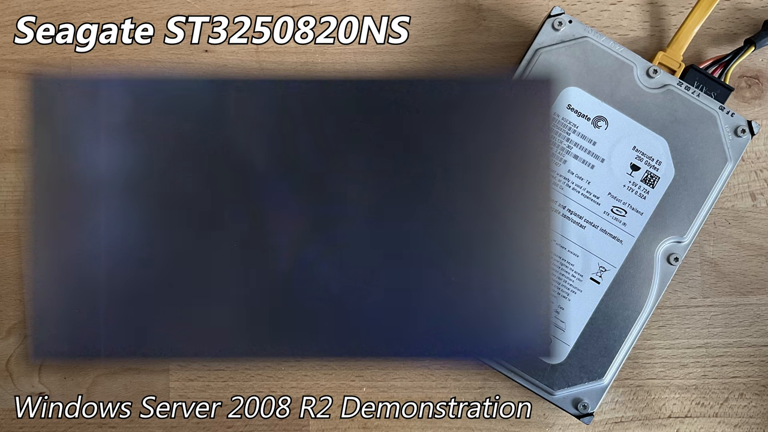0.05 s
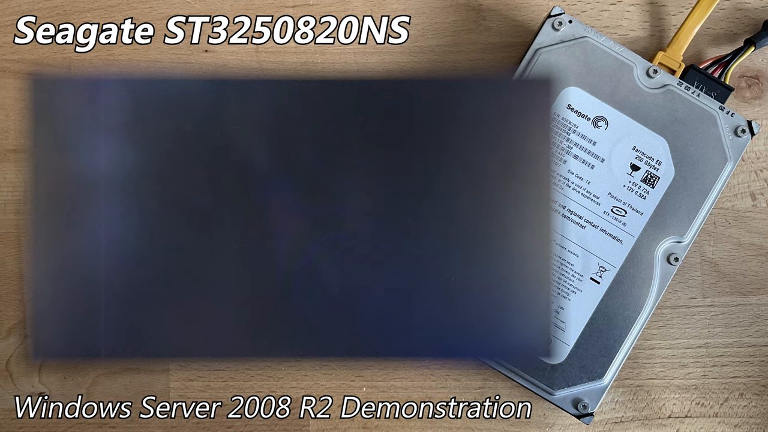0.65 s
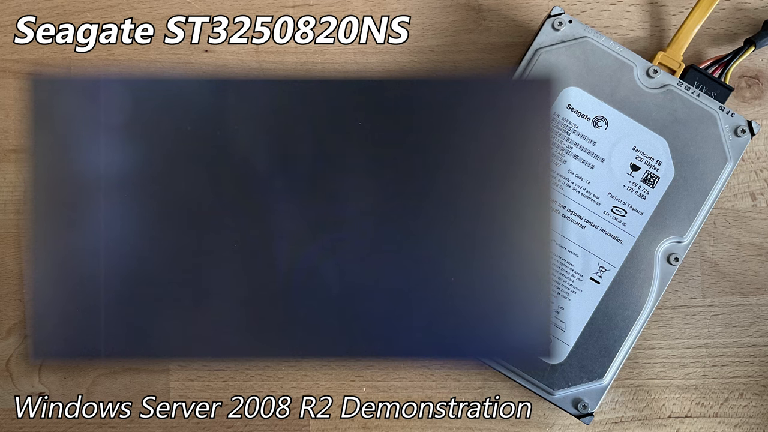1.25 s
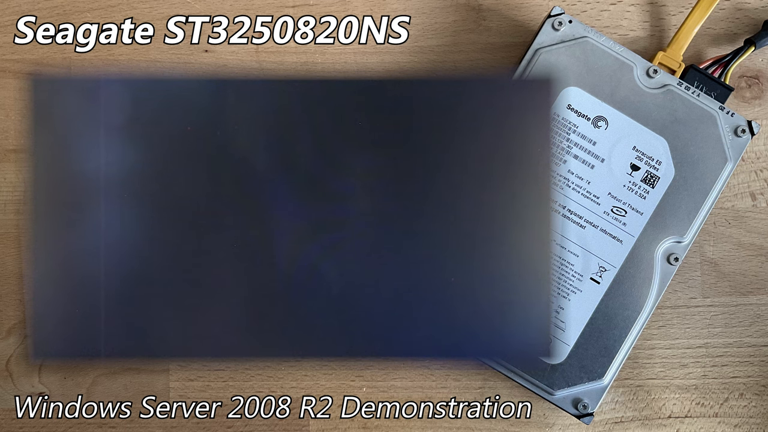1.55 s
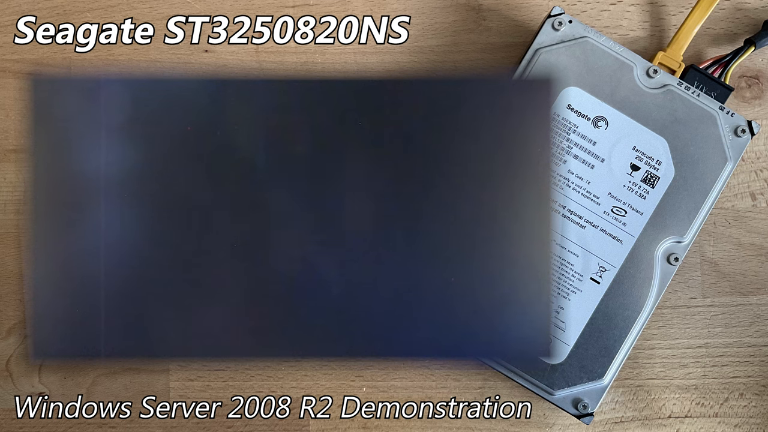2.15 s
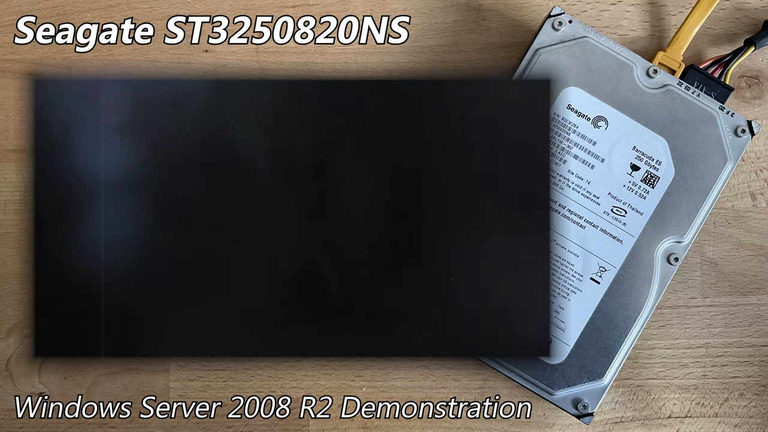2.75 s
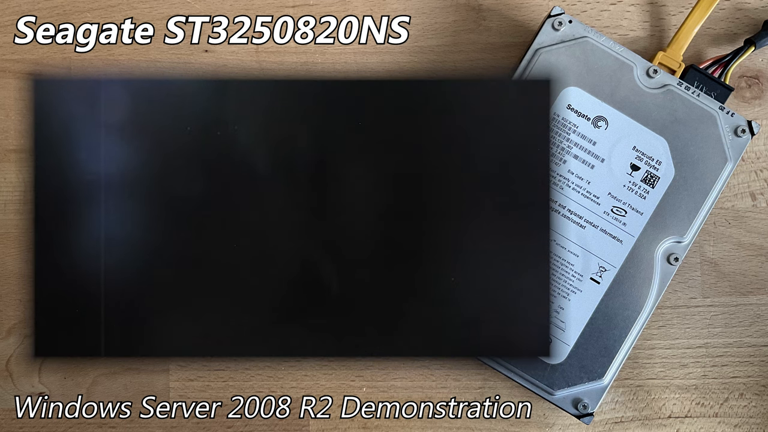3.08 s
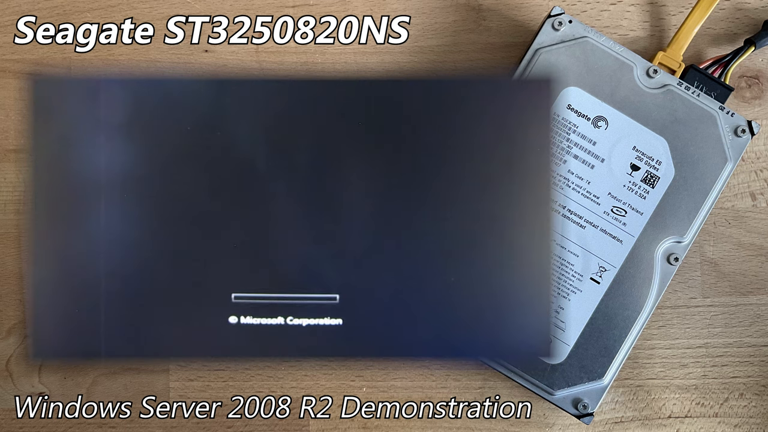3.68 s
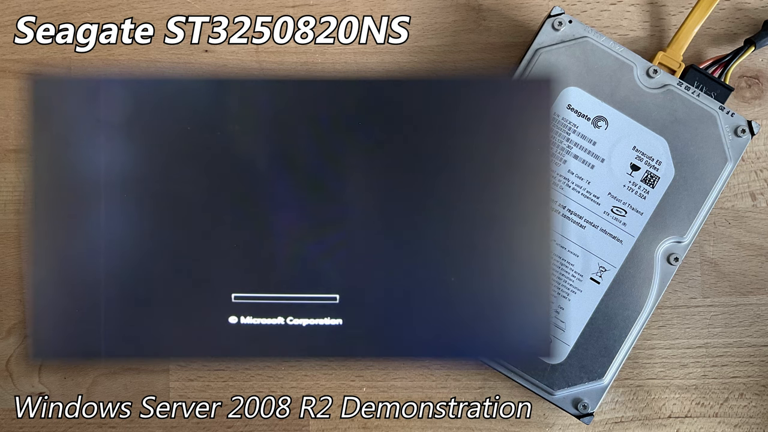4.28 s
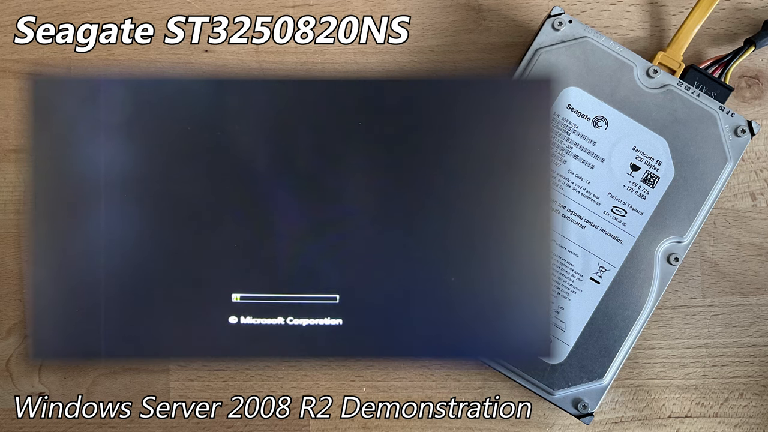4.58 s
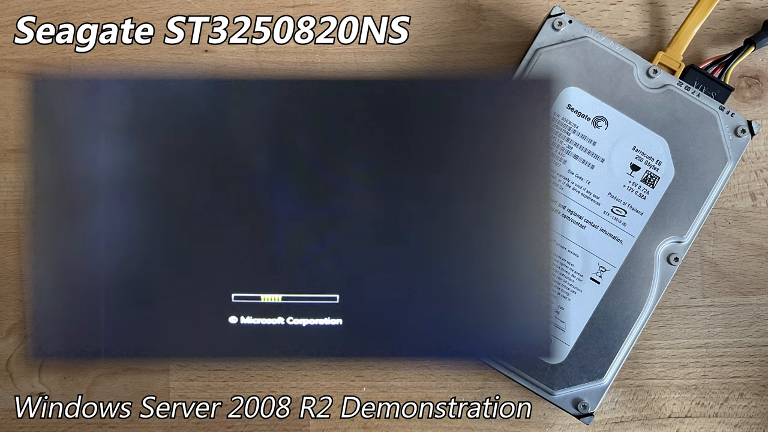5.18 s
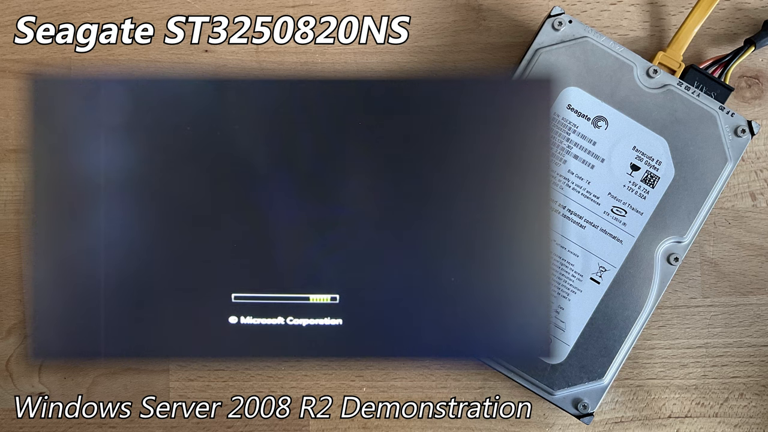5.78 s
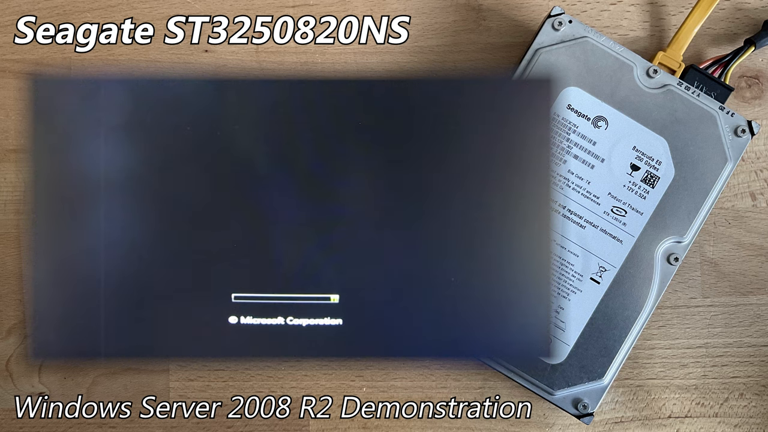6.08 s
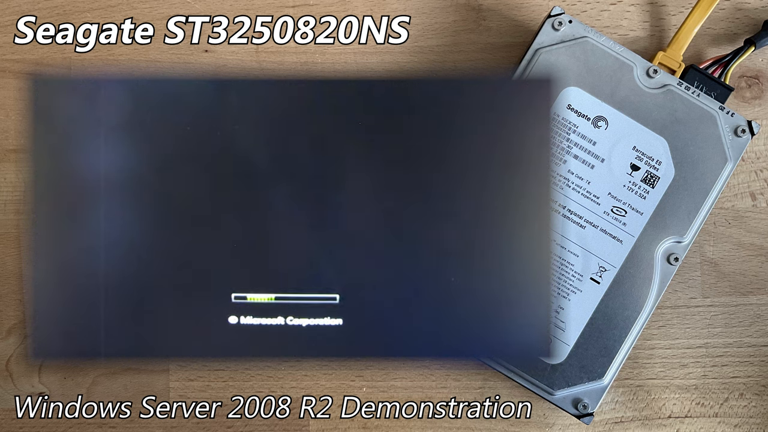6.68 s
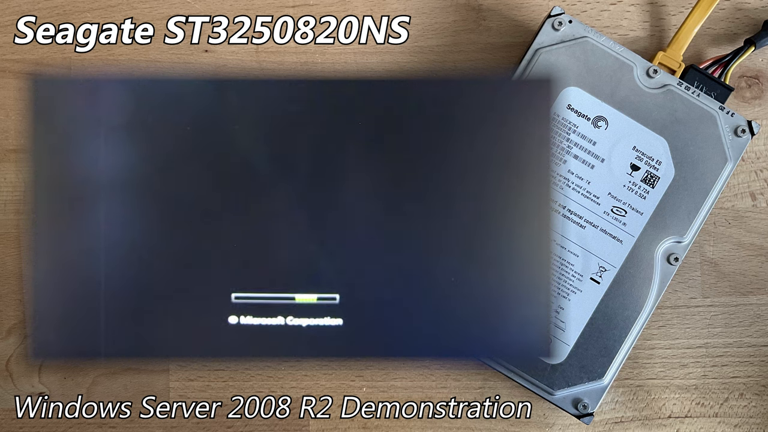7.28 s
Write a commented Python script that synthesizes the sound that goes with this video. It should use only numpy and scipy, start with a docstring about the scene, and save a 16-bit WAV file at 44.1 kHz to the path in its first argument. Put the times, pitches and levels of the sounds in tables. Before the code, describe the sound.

Close hard drive whirr with scattered seek clicks, a quieter stretch, then low desk thumps and more ticking.

```python
"""Hard drive on a desk

A bare 7200 rpm hard drive works on a wooden desk, heard close up over room rumble and mains hum.
The spindle hums and whines, and air dragged by the platters rushes in the casing.
The head arm ticks, chirps and clacks as it seeks; its longest strokes thump the desk."""
import sys
import numpy as np
from scipy import signal
from scipy.fft import rfft, irfft, next_fast_len
from scipy.io import wavfile
from scipy.ndimage import map_coordinates

SR = 44100
rng = np.random.default_rng(int(sys.argv[2]) if len(sys.argv) > 2 else 0)


def put_to_file(sound):
    """Save the sound as 16-bit audio at rate SR, in the file named by the first command-line argument."""
    columns = np.atleast_2d(sound).T  # one column per channel
    safe = np.clip(columns, -1, 1)
    whole_steps = np.round(safe * 32767)
    wavfile.write(sys.argv[1], SR, whole_steps.astype(np.int16))


N = 332514
t = np.arange(N) / SR

# A hollow in the sound at the listening spot. Each row: centre in Hz, width in Hz, gain in dB.
HOLLOW = [(688, 131, -19)]
# Tone of the shaken desk. Each row: frequency in Hz, gain in dB.
DESK_SHUDDER = [(30, -24), (75, 6), (150, -6), (205, 5), (240, -6.5), (270, -3), (370, -11.5), (440, -20.5),
                (800, -48), (4000, -85)]
# Spells of reading. Each row: start and end in seconds, chatter level in dB, faint seeks a second.
READ_SPELLS = [(0, 1.83, -44, 11), (5.25, 7.54, -43, 7)]
# Long seeks that kick the arm hard. Each row: start in seconds, relative level in dB.
LONG_SEEKS = [(5.1546, -14.5), (7.2205, -14.5), (7.2946, -14.5)]
# Full strokes across the platters. Each row: start in seconds, thump and hiss gains in dB.
FULL_STROKES = [(4.3482, 0, -31), (4.4237, 1, -31), (4.4397, 0, -29.5), (4.4901, .5, -31), (5.486, .5, -31),
                (5.5162, .8, -32)]


def amp(db):
    """Decibels to gain."""
    return 10 ** (np.asarray(db) / 20)


def unit(x):
    """Scale to rms 1."""
    return x / np.sqrt(np.mean(x ** 2) + 1e-20)


def response(points, bells=(), size=16384):
    """Impulse response of unit energy from (Hz, dB) points and (Hz, width in Hz, dB) bells."""
    hz = np.fft.rfftfreq(size, 1 / SR)
    point_hz, point_db = np.transpose(points)
    db = np.interp(np.log(hz + 1), np.log(np.sort(point_hz)), point_db)
    for centre, width, lift in bells:
        db = db + lift * .5 ** ((2 * (hz - centre) / width) ** 2)
    # minimum phase, so nothing rings before the hit
    cepstrum = irfft(np.log(unit(amp(db))), size)
    cepstrum[1:size // 2] *= 2
    cepstrum[size // 2 + 1:] = 0
    return irfft(np.exp(rfft(cepstrum)), size)


def coloured(x, points, bells=()):
    """Play x through a body with this tone curve and these peaks or dips."""
    return signal.fftconvolve(x, response(points, bells))[:N]


def filtered(x, gain_at):
    """Filter x by a complex gain, given as a function of Hz."""
    size = next_fast_len(N + SR)
    return irfft(rfft(x, size) * gain_at(np.fft.rfftfreq(size, 1 / SR)), size)[:N]


def wobble(rate):
    """A smooth random curve, rate knots a second."""
    return map_coordinates(rng.standard_normal(int(N * rate / SR) + 4), [t * rate / SR])


def add(track, start, sound):
    """Mix a sound into a track at start seconds."""
    part = track[max(0, round(start * SR)):][:len(sound)]
    part += sound[:len(part)]


def tone(cycles):
    """A sine of rms 1 with a random starting phase."""
    return np.sqrt(2) * np.sin(2 * np.pi * (cycles + rng.random()))


def burst(rise_s):
    """A puff of noise that swells for rise_s and dies away."""
    age = t[:SR // 20] / rise_s
    return age * np.exp(1 - age) * rng.standard_normal(len(age))


def tap(body, rise_s):
    """A short rough push on a body, with peak 1."""
    sound = signal.fftconvolve(burst(rise_s), body)
    return sound / np.abs(sound).max()


def room_rumble(level_db=-33):
    """The room's deep rumble lies under everything."""
    # Each row: frequency in Hz, gain in dB.
    rumble_eq = [(5, 1.5), (15, -5), (25, -19.5), (36, -21.5), (60, -27), (150, -67), (1000, -120)]
    return amp(level_db) * unit(coloured(rng.standard_normal(N), rumble_eq))


def mains_hum(hz=50):
    """Steady electrical hum on odd harmonics."""
    # Each row: harmonic number, rms level in dB.
    harmonics = [(1, -34.3), (5, -58), (7, -59)]
    return sum(amp(db) * tone(k * hz * t) for k, db in harmonics)


def spindle(turn_hz=120.075, waver_db=1.85):
    """Platter imbalance hums once a turn; the motor poles whine at high multiples."""
    # The partials, as multiples of the turning rate.
    multiples = [1, 3, 12, 13, 14, 15, 16, 24, 25, 84, 88]
    # The rms level of each partial in dB.
    levels = [-26, -58, -61, -53.5, -56.5, -62, -44.5, -66, -69, -92.5, -85]
    turns = turn_hz * t + .0021 * wobble(3)
    return sum(amp(db + waver_db * (k > 2) * wobble(9)) * tone(k * turns)
               for k, db in zip(multiples, levels))


def air_rush(level_db=-39.6, flutter_db=.3):
    """Air dragged round by the platters excites the casing."""
    # Tone of the rush. Each row: frequency in Hz, gain in dB.
    air_eq = [(80, -9), (150, -2.4), (420, -1.8), (800, -8), (1000, -.5), (1400, -6.7), (2300, -6.8),
              (2680, -16.7), (3200, -13.5), (5400, -14.2), (6600, -19.4), (9750, -20), (10200, -36.5),
              (11200, -36.5), (12600, -50)]
    # Casing resonances. Each row: centre in Hz, width in Hz, lift in dB.
    casing = [(505.4, 83, 10.5), (1187, 110, 7), (1668, 126, 12), (2073, 265, 7.5), (2440, 117, 10),
              (2902, 233, 12), (3400, 190, 6), (3614, 360, 8.5), (4740, 160, 4), (8080, 460, 8),
              (8680, 352, 6)]
    gain = amp(level_db + flutter_db * wobble(9.7))
    return gain * coloured(rng.standard_normal(N), air_eq, casing + HOLLOW)


def arm_effort(swing_db=4, attack_s=.015, release_s=.023):
    """How hard the arm works: low and uneven in each spell, with flurries that rise, hold and fall."""
    # Flurries of tiny seeks. Each row: start in seconds, hold in seconds, level in dB.
    flurries = [(.095, 0.021, -32.5), (0.146, 0.072, -26.5), (1.57, 0.052, -38), (1.695, 0.049, -30.5),
                (1.775, 0.044, -38.5), (4.562, 0.036, -31), (4.74, 0.16, -29.5), (4.948, .035, -30.5),
                (5.2, 0.062, -33.5), (6.503, 0.035, -36.5), (6.753, 0.037, -37), (6.912, 0.039, -38.5)]
    reading = sum(amp(db) * (t >= start) * (t < end) for start, end, db, _ in READ_SPELLS)
    surges = np.zeros(N)
    for start, hold, db in flurries:
        corners = [start - attack_s, start, start + hold, start + hold + release_s]
        surges += amp(db) * np.interp(t, corners, [0, 1, 1, 0])
    return np.maximum(reading * amp(swing_db * wobble(20)), surges)


def chatter(seeks_per_s=70, tick_db=-28.5, tick_slope=.46, rattle_s=.0018):
    """Runs of tiny seeks shake the desk and tick faintly; between runs the arm rests."""
    # Tone of the ticks. Each row: frequency in Hz, gain in dB.
    tick_eq = [(800, -19), (1500, 5), (2200, 3.5), (3500, -10), (6300, -7.5), (7400, -28.5), (13000, -69)]
    effort = arm_effort()
    times = np.cumsum(rng.uniform(.5, 1.5, 1200)) / seeks_per_s
    onsets = (times[times < t[-1]] * SR).astype(int)
    jolts = np.zeros(N)
    jolts[onsets] = rng.choice([-1, 1], len(onsets)) * amp(rng.normal(0, 1.2, len(onsets)))
    jolts = unit(jolts)
    shudder = coloured(jolts * effort, DESK_SHUDDER)
    # a brief rattle follows every jolt
    tails = signal.fftconvolve(np.abs(jolts), np.exp(-t[:SR // 50] / rattle_s))[:N]
    rattle = unit(tails * rng.standard_normal(N)) * effort ** tick_slope * amp(tick_db)
    return shudder + coloured(rattle, tick_eq, [(2937, 200, 12)])


def faint_seeks(knock_db=-33, edge_db=-46.5, count=60):
    """Scatter weak seeks through each spell, as rows of start, knock level and edge level."""
    rows = []
    for start, end, _, rate in READ_SPELLS:
        times = start + (np.arange(count) + rng.random(count)) / rate
        levels = [knock_db, edge_db] + rng.standard_normal((count, 2))
        rows += [(time, *dbs) for time, dbs in zip(times, levels) if time < end]
    return rows


def short_seeks(knock_gain_db=3, edge_gain_db=13.5, lag_s=.0004):
    """Each jump knocks the arm's resonances; abrupt ones add a bright edge."""
    # Seeks that stand out. Each row: start in seconds, relative knock and edge levels in dB.
    accents = [(0.163, -25, -44), (0.176, -33, -46), (.205, -32, -47), (.235, -24, -34.5), (.469, -31, -39),
               (0.5142, -25.5, -37), (.651, -25, -35.5), (.816, -32, -36), (0.885, -33, -41),
               (1.0635, -19, -31.5), (1.115, -28.5, -46), (1.191, -26, -43), (1.225, -25.5, -35.5),
               (1.359, -26.5, -51), (1.453, -33, -43), (1.4739, -27.5, -47), (1.579, -32, -49),
               (1.793, -31, -48), (4.516, -18.5, -39), (4.556, -26, -37), (4.627, -27.5, -41.5),
               (4.635, -24.5, -37), (4.8194, -23, -34), (4.855, -28, -42.5), (5.0175, -30, -43),
               (5.101, -27.5, -55), (5.285, -27, -47), (5.583, -32, -53), (5.70, -26, -49),
               (6.9644, -32.5, -44.5), (7.1217, -38, -40.5)]
    # Tones of the knock and of its edge. Each row: frequency in Hz, gain in dB.
    knock_eq = [(800, -30), (1400, -11), (2300, -7.5), (2650, -8), (3300, -12.5), (4200, -22.5),
                (7000, -39.5), (13000, -91)]
    edge_eq = [(800, -32), (1500, 4), (2150, 2), (2700, -9), (3900, 0), (5000, 5.5), (5220, -13.5),
               (5500, 3), (6200, 0), (6900, -9), (7400, -27), (13000, -64.5)]
    # Head arm resonances. Each row: centre in Hz, width in Hz, lift in dB.
    arm_modes = [(2100, 190, 12), (2940, 220, 14.5)]
    knock_body, edge_body = response(knock_eq, arm_modes), response(edge_eq)
    out = np.zeros(N)
    for start, knock_db, edge_db in accents + faint_seeks():
        knock = amp(knock_db + knock_gain_db) * tap(knock_body, rise_s=.0009)
        edge = amp(edge_db + edge_gain_db) * tap(edge_body, rise_s=.0008)
        add(out, start + lag_s, knock + edge)
    return out


def chirps(start_hz=5450, end_hz=7100, length_s=.0039, note_gain_db=1):
    """A quick head step sings a rising note of a few milliseconds over a click."""
    # Each row: start in seconds, peak level of the click in dB.
    steps = [(0.2596, -27), (0.8173, -26.5), (1.6499, -28), (5.032, -25.5), (5.1484, -28), (7.214, -27),
             (7.2883, -28)]
    # Tone of the click. Each row: frequency in Hz, gain in dB.
    click_eq = [(600, -8.5), (1500, 10.5), (3000, -5), (6000, 2), (8000, -3.5), (11500, -20),
                (13000, -33.5)]
    age = t[:int(length_s * SR)]
    cycles = (start_hz + (end_hz - start_hz) * age / length_s / 2) * age
    note = np.sin(2 * np.pi * cycles) * np.sin(np.pi * age / length_s) ** 2
    click_body, out = response(click_eq), np.zeros(N)
    for start, db in steps:
        add(out, start, amp(db + note_gain_db) * note)
        add(out, start, amp(db) * tap(click_body, rise_s=.0017))
    return out


def clacks(ring_gain_db=-3, crack_gain_db=-10, attack_s=.0014, brake_s=.011, brake_db=-2):
    """A long seek kicks once to start and once to stop, setting arm and casing ringing."""
    # What a kick rings. Each row: frequency in Hz, relative level in dB, seconds to fall 60 dB.
    modes = [(196, -6, 0.094), (337, -9, 0.038), (1220, -12, 0.022), (1643, -3, 0.021), (2924, -5.5, 0.034),
             (4810, -4, 0.044)]
    # Tone of the kick's crack. Each row: frequency in Hz, gain in dB.
    crack_eq = [(300, 2), (1700, 6), (4000, -2.5), (5500, -4), (6300, 4.5), (6900, 8), (7400, -6),
                (8000, -16), (10000, -23.5), (12500, -33)]
    brakes = [(start + brake_s, db + brake_db) for start, db in LONG_SEEKS]
    age = t[:SR // 8]
    fade_in = 1 - np.exp(-(age / attack_s) ** 2)
    rings, cracks = np.zeros(N), np.zeros(N)
    for start, db in LONG_SEEKS + brakes:
        ring = np.zeros(len(age))
        for hz, mode_db, t60 in modes:
            decay = amp(mode_db + rng.normal(0, 1.1) - 60 * age / t60)
            ring += decay * np.sin(2 * np.pi * (hz * age + rng.random()))
        add(rings, start, amp(db + ring_gain_db) * ring * fade_in)
        add(cracks, start, amp(db + crack_gain_db) * burst(rise_s=.0011))
    return rings + coloured(cracks, crack_eq, HOLLOW)


def desk_jolts(stroke_gain_db=-20, seek_gain_db=-11):
    """Every full stroke and long seek shakes the desk once."""
    hits = [(start, db + stroke_gain_db) for start, db, _ in FULL_STROKES]
    hits += [(start, db + seek_gain_db) for start, db in LONG_SEEKS]
    desk, out = response(DESK_SHUDDER), np.zeros(N)
    for start, db in hits:
        add(out, start, amp(db) * tap(desk, rise_s=.003))
    return out


def full_strokes(length_s=.0136, hiss_gain_db=1, hiss_lead_s=.001):
    """The arm speeds up, then brakes: the recoil rocks the desk while the coil hisses."""
    # Desk resonances. Each row: centre in Hz, width in Hz, gain in dB.
    desk_modes = [(75, 10, 2.3), (85, 12, -6.2), (154, 55, -9), (205, 30, -15), (350, 70, -10)]
    # Tone of the coil's hiss. Each row: frequency in Hz, gain in dB.
    hiss_eq = [(700, -7), (1300, 2.5), (2100, 7.5), (2700, -3.5), (3600, -5), (5200, -4.5), (5600, -1),
               (6400, -2), (6900, -9), (7300, -29), (13000, -78)]
    progress = t[:int(length_s * SR)] / length_s
    recoil, hiss = np.zeros(N), np.zeros(N)
    for k, (start, thump_db, hiss_db) in enumerate(FULL_STROKES):
        direction = (-1) ** k  # out and back in turn
        add(recoil, start, direction * amp(thump_db) * np.sin(2 * np.pi * progress))
        puff = np.sin(np.pi * progress) * rng.standard_normal(len(progress))
        add(hiss, start - hiss_lead_s, amp(hiss_db + hiss_gain_db) * puff)
    desk = lambda hz: sum(amp(db) * 1j * hz * width / (centre ** 2 - hz ** 2 + 1j * hz * width)
                          for centre, width, db in desk_modes)
    thumps = coloured(filtered(recoil, desk), [(100, 0)], HOLLOW)  # flat but for the hollow
    return thumps + coloured(hiss, hiss_eq, HOLLOW)


def scene():
    """The steady bed and all the head movements, in mono."""
    bed = spindle() + air_rush() + mains_hum() + room_rumble()
    return (bed + short_seeks() + chatter() + chirps() + clacks() + full_strokes() + desk_jolts())[None]


def record(dry, top_hz=12800):
    """A brick-wall low-pass takes off the highest treble."""
    return filtered(dry[0], lambda hz: hz < top_hz)[None]


dry = scene()
out = record(dry)
put_to_file(out)
```